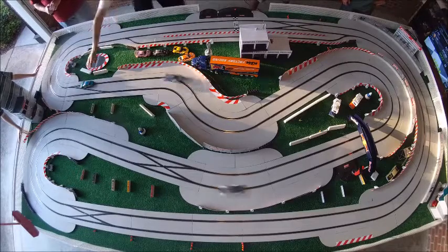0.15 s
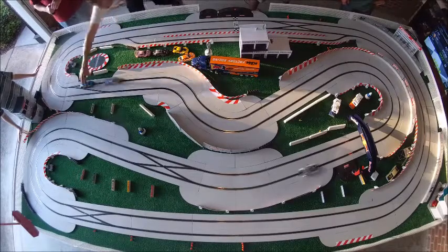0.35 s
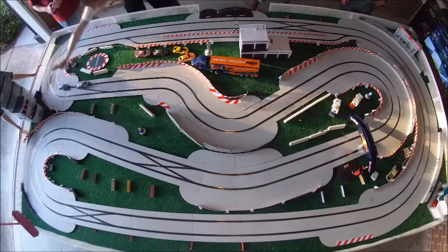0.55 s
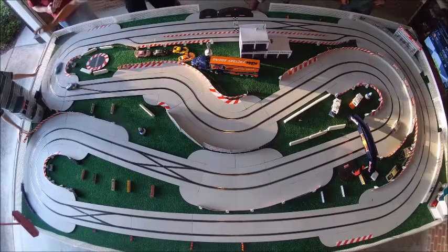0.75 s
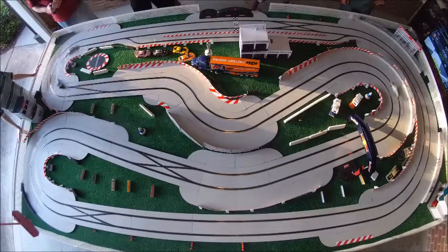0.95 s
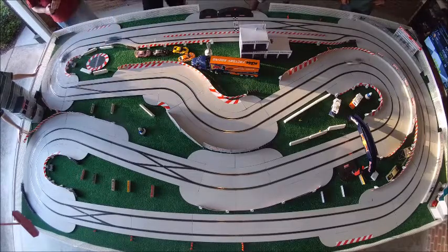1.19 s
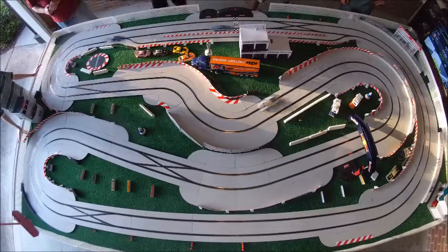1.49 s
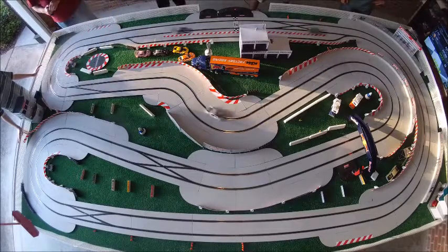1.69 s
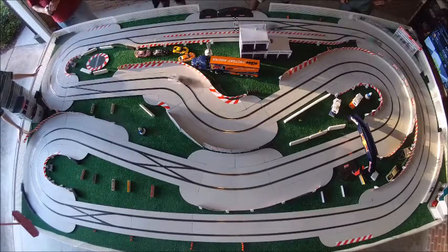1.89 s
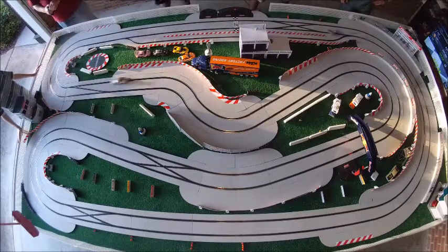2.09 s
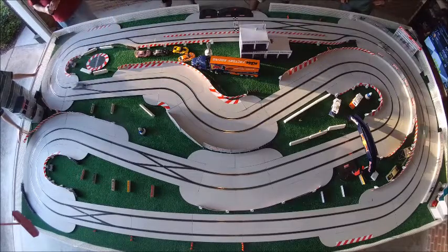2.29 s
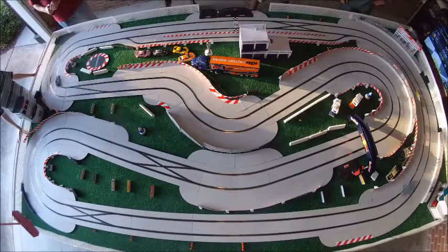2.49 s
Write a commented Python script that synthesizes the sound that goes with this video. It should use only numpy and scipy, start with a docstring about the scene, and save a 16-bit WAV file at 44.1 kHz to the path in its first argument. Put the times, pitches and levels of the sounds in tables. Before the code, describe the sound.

Small electric toy cars hiss and drum along a hollow plastic track, heard from overhead in a room at home. A sharp crack comes as two collide, then one speeds up with a rising whine amid scattered clicks.

```python
"""In a lively room, toy slot cars run round a plastic track, heard from above the table.
Tyres drum the hollow track, metal braids (the cars' electric contacts) hiss on the rails, and a gear
whines as one car speeds up. Guide pins tick over the joints, and one car smacks into another with a
crack that rings through the room. Brief tones come and go over soft room noise and a faint hum."""
import sys
import numpy as np
from scipy import signal
from scipy.fft import rfft, irfft
from scipy.io import wavfile
from scipy.ndimage import uniform_filter1d

SR = 44100
rng = np.random.default_rng(int(sys.argv[2]) if len(sys.argv) > 2 else 0)


def dump_mix(stems):
    """Bounce the given channels to the path in sys.argv[1] as a 16-bit WAV at rate SR."""
    frames = np.atleast_2d(stems).T  # one column per channel
    limited = np.clip(frames, -1, 1)  # hard clip at full scale
    pcm = np.round(limited * 32767).astype(np.int16)
    wavfile.write(sys.argv[1], SR, pcm)


N = 116865

# How loud the running cars are. Each row: time in seconds, drumming in dB, hiss in dB, sizzle in dB.
CAR_LEVELS = [(0, -38, -41, -54), (.13, -44, -42.5, -58), (.25, -38, -34.5, -52), (.34, -42, -44.5, -59),
              (.41, -42, -40.5, -62), (.46, -37.5, -42, -61), (.55, -44, -37, -48), (.74, -52, -51, -69),
              (.92, -48.5, -46.5, -62), (.98, -46.5, -47.5, -65), (1.04, -39, -42, -61),
              (1.13, -40, -42.5, -61), (1.24, -40, -37.5, -59), (1.43, -41, -39.5, -54.5),
              (1.6, -36.5, -35, -51), (1.69, -38.5, -36, -52.5), (1.78, -37.5, -37, -52),
              (1.87, -40.5, -37.5, -55), (2.0, -37, -36, -55), (2.1, -39, -38.5, -50.5),
              (2.19, -36, -35, -49.5), (2.37, -41, -41.5, -56.5), (2.65, -40.5, -41.5, -56)]
# The notes the hollow track rings at. Each row: pitch in Hz, width in Hz, relative level in dB.
TRACK_NOTES = [(340, 260, -24), (485.3, 141, -10.5), (650, 270, -2), (815, 223, -4.5), (1061, 356, -1),
               (1301, 350, 0), (1524, 385, -2)]


def undb(db):
    """Turn decibels into a number to multiply a sound by."""
    return 10 ** (np.asarray(db) / 20)


def unit(x):
    """Scale a sound so that its average strength (rms) is 1."""
    return x / np.sqrt(np.mean(x ** 2))


def curve(table, col):
    """Join the values in one column with straight lines over time."""
    rows = np.array(table, float)
    return np.interp(np.arange(N) / SR, rows[:, 0], rows[:, col])


def colour(x, points, skirt_db=30):
    """Shape the tone by (Hz, dB) points; beyond them it falls by skirt_db per octave."""
    hz, db = np.array(points, float).T
    octave, marks = np.log2(np.fft.rfftfreq(N, 1 / SR) + 1), np.log2(hz)
    outside = np.clip(marks[0] - octave, 0, 9) + np.clip(octave - marks[-1], 0, 9)
    return irfft(rfft(x) * undb(np.interp(octave, marks, db) - skirt_db * outside), N)


def band(x, hz, width):
    """Keep the sound near one pitch, as a ringing object does; the width is in Hz."""
    return signal.lfilter(*signal.iirpeak(hz, hz / width, fs=SR), x)


def walk(rate):
    """A smooth random wobble of size about 1, with `rate` new values a second."""
    hold = int(SR / rate)
    steps = np.repeat(rng.standard_normal(N // hold + 1), hold)
    return 1.37 * uniform_filter1d(uniform_filter1d(steps, hold), hold)[:N]


def grit(per_s, scatter_db):
    """Many tiny bumps of uneven size, at random moments."""
    chance, side, size = rng.random((N, 3)).T
    return (chance < per_s / SR) * np.sign(side - .5) * undb(-scatter_db * np.log(size + 0.0014))


def room_air():
    """Soft room noise whose bass comes and goes, and a faint wavering hum."""
    # The tone of the room noise. Each row: pitch in Hz, relative level in dB.
    air_tone = [(30, -33), (100, -30), (200, -25), (294, -20), (447, -7.5), (900, -3), (1240, -4),
                (1990, -6.5), (3360, -5.5), (6480, -13.5), (9000, -32), (15800, -31)]
    # How loud the hum is. Each row: time in seconds, level in dB.
    hum_levels = [(0, -67), (.3, -78), (.42, -70), (.5, -88), (1.6, -84), (2.65, -80)]
    hum = unit(band(rng.standard_normal(N), hz=130, width=14)) * undb(curve(hum_levels, col=1))
    noise = unit(colour(rng.standard_normal(N), air_tone)) * undb(-48)
    bass = signal.sosfilt(signal.butter(2, 110, fs=SR, output="sos"), noise)
    return noise - bass + bass * undb(4.4 * walk(5.6) - 2) + hum


def room_echo(x):
    """Sound bounces round the room and dies away, each range of pitches at its own speed."""
    # How long the room rings. Each row: pitch in Hz, seconds to fade by 60 dB.
    fade_times = [(500, 0.32), (1300, 0.77), (3500, 0.57), (6500, 0.61), (11000, 0.3)]
    hz, seconds = np.array(fade_times).T
    t, tail = np.arange(SR) / SR, 0
    for low_hz in 250 * 2. ** np.arange(0, 6.4, .5):  # bands half an octave wide
        fade_s = np.interp(np.log(low_hz * 2 ** .25), np.log(hz), seconds)
        edges_hz = [low_hz, min(low_hz * 2 ** .5, SR * .49)]
        one_band = signal.butter(2, edges_hz, "band", fs=SR, output="sos")
        tail += signal.sosfilt(one_band, rng.standard_normal(SR)) * undb(-60 * t / fade_s)
    tail *= np.clip(t / 0.0041, 0, 1) ** 2  # the echo takes a moment to build up
    return signal.fftconvolve(x, tail / np.sqrt(np.sum(tail ** 2)))[:N]


def squeaks():
    """Brief wavering tones, from low hums to high squeaks."""
    # The tones. Each row: start in seconds, length in seconds, pitch in Hz, level in dB, wobble in Hz.
    brief_tones = [(0.28, 0.075, 521, -49, 24.6), (0.986, 0.12, 645, -46.5, 10), (1.1, 0.16, 482, -47.5, 6),
                   (1.015, 0.14, 1387, -39.5, 150), (1.08, .1, 1900, -48, 120), (1.187, .14, 2410, -45, 70),
                   (1.46, 0.029, 3380, -45, 46), (1.645, 0.05, 5010, -43, 6), (1.915, 0.08, 5005, -41, 4),
                   (1.709, 0.046, 650, -42, 30), (1.7, .25, 1318, -42, 124), (1.75, 0.04, 1030, -39, 25),
                   (1.988, 0.063, 830, -43, 20), (2.0, 0.068, 1205, -39, 15), (2.123, 0.04, 1220, -46, 20),
                   (2.16, 0.056, 1560, -38, 38)]
    t, out = np.arange(N) / SR, 0
    for start, length, hz, db, wobble_hz in brief_tones:
        swell = np.sin(np.pi * np.clip((t - start) / length, 0, 1)) ** .5
        cycles = np.cumsum(hz + wobble_hz * walk(90)) / SR
        out += undb(db + 2 * walk(59.64)) * swell * np.sin(2 * np.pi * cycles)
    return out


def gear_whine():
    """A small gear drives a bigger one: a rough tone and its octave, rising as the car speeds up."""
    # The whine of the teeth. Each row: time in seconds, pitch in Hz, level in dB, octave's level in dB.
    whine = [(.78, 815, -62, -76), (.85, 865, -52, -65), (.93, 930, -50, -68), (1.0, 985, -46, -59),
             (1.04, 1026, -52, -62), (1.07, 1085, -41, -55), (1.17, 1090, -41.5, -53),
             (1.22, 1140, -47, -52), (1.26, 1210, -39, -47), (1.33, 1221, -45, -45),
             (1.41, 1275, -40.5, -50), (1.45, 1380, -56, -60), (1.52, 1412, -65, -67)]
    pitch_wobble, rough_db = .018, 3.5
    hz = curve(whine, col=1) * (1 + pitch_wobble * walk(120))
    phase = 2 * np.pi * np.cumsum(hz) / SR
    t, out = np.arange(N) / SR, 0
    for harmonic in (1, 2):
        level_db = curve(whine, col=harmonic + 1) + rough_db * walk(44.9)
        out += undb(level_db) * np.sin(harmonic * phase)
    return out * ((t > whine[0][0]) & (t < whine[-1][0]))


def track_drumming():
    """Tyres and guide pins shake the hollow track; each of its notes wavers on its own."""
    drum = 0
    for hz, width, db in TRACK_NOTES:
        gain = undb(db + 2 * walk(7.06))
        bumps = grit(per_s=5000, scatter_db=2.5)
        drum += gain * unit(band(band(bumps, hz, width), hz, 1.22 * width))
    return unit(drum) * undb(curve(CAR_LEVELS, col=1))


def braid_hiss():
    """Metal braids scrape the rails: a gritty, wavering hiss with a thin sizzle on top."""
    # The tone of the hiss and of the sizzle. Each row: pitch in Hz, relative level in dB.
    hiss_tone = [(1800, -4.5), (2400, -2.5), (2900, -4), (3400, -1), (4500, -5.5), (5300, -2.5),
                 (6300, -4.5), (7500, -12.5), (8500, -21)]
    sizzle_tone = [(8500, 1.5), (9500, -5.5), (12900, -9), (15800, -24)]
    scrape = unit(grit(per_s=2500, scatter_db=2)) + 0.64 * rng.standard_normal(N)
    flicker = undb(walk(18))  # about 1 dB up and down
    wavering = sum(undb(2 * walk(7.54)) * band(scrape, hz, 1.46 * hz)
                   for hz in (2000, 3100, 4200, 6000, 8200))
    hiss = unit(colour(wavering, hiss_tone)) * undb(curve(CAR_LEVELS, col=2))
    sizzle_db = curve(CAR_LEVELS, col=3) + 0.5 * walk(13)
    sizzle = unit(colour(scrape, sizzle_tone, skirt_db=11)) * undb(sizzle_db)
    return flicker * (hiss + sizzle)


def ticks_and_crash():
    """Each hit cracks, rings the car's shell and thuds the track. Gives direct sound and echo feed."""
    # Guide pins hitting joints, and car hitting car. Each row: start in seconds, peak in dB,
    # pitch in Hz, width in Hz, length in seconds, relative thud level in dB.
    hits = [(0.169, -24.5, 5360, 4000, 0.0049, -7), (0.239, -24, 3000, 2520, 0.0025, 2),
            (0.36, -25.5, 5460, 3500, 0.0036, -14), (0.399, -22, 5670, 2480, 0.0069, -25),
            (0.4047, -22, 5200, 5000, 0.0066, 1), (.471, -26, 6500, 5000, 0.0038, -10),
            (0.4753, -4.5, 6000, 7000, 0.0015, -5.5), (.4782, -8, 3800, 4950, 0.0035, -6),
            (0.4832, -14, 6400, 2500, 0.0049, 3), (.494, -20, 5000, 4000, 0.0066, -2),
            (0.5, -18, 6000, 4000, 0.0047, -2), (0.509, -19.5, 4200, 2500, 0.0043, -11),
            (0.5134, -13.5, 4760, 4000, .004, -7), (1.203, -23.5, 5500, 6000, 0.0037, -5),
            (1.277, -26, 5000, 4000, 0.0036, -7), (1.469, -30, 3450, 1200, 0.0092, -12),
            (1.61, -21, 3860, 2980, 0.0054, -19), (1.717, -12.5, 5560, 5500, 0.0021, -25),
            (1.73, -27, 6500, 4000, .003, -10), (1.7625, -12.5, 7150, 3500, 0.0025, -1),
            (1.767, -19, 6000, 4000, 0.003, -2), (1.78, -24, 5540, 2500, .005, 1),
            (1.791, -26, 5570, 3000, .005, -10), (1.877, -23.5, 6000, 2480, 0.0046, -19),
            (2.016, -24.5, 3660, 3020, 0.0052, -16), (2.09, -18.5, 7600, 5200, 0.0028, -28),
            (2.1, -24, 3800, 2000, 0.0066, -8), (2.109, -26, 3900, 2500, .006, -12),
            (2.12, -25.5, 3330, 1200, .004, -13), (2.1505, -19.5, 5600, 2800, 0.0093, 3),
            (2.169, -19.5, 6000, 5000, .001, -15), (2.182, -23.5, 5000, 4000, 0.0045, -18),
            (2.218, -27, 3760, 2000, .01, -10), (2.24, -14, 6000, 3000, 0.0013, -20),
            (2.271, -18, 6000, 4500, 0.0013, 4), (2.427, -23.5, 5460, 5040, 0.0045, -12),
            (2.492, -26.5, 6000, 5100, 0.0062, -14)]
    # The plastic shell's notes. Each row: pitch in Hz, relative level in dB, rough ring time in seconds.
    shell_notes = [(2560, 7, 0.0047), (3070, -8, 0.0032), (3880, -5, 0.0026), (5200, 5.5, 0.015),
                   (6350, 5, 0.029), (7350, -23, 0.0031), (8140, -11, 0.006)]
    out, t = np.zeros((2, N + 4096)), np.arange(2048) / SR
    click = 1. * (t == 0)
    cut_highs = signal.butter(4, 8060, fs=SR, output="sos")
    cut_lows = signal.butter(4, 2300, "high", fs=SR, output="sos")

    def peak_one(x):
        return x / np.abs(x).max()

    def soften(x):  # a little of the top treble stays in, for snap
        return signal.sosfilt(cut_lows, signal.sosfilt(cut_highs, x) + undb(-22) * x)

    def crackle(x, hz, width):
        return band(band(x, hz, width), hz, 1.8 * width)

    def thud(x):  # only the track's three highest notes
        return sum(undb(db) * band(band(x, hz, width), hz, 3 * width) for hz, width, db in TRACK_NOTES[4:])

    for start, peak_db, hz, width, length, thud_db in hits:
        rise_s, fade_s = .4 * length, length / 2
        shape = np.minimum(t / rise_s, 1) * np.exp(-np.maximum(t - rise_s, 0) / fade_s)
        push = rng.standard_normal(len(t)) * shape
        crack = crackle(push, hz, width)
        ring = sum(undb(db) * band(crack, note_hz, 0.49 / ring_s) for note_hz, db, ring_s in shell_notes)
        plastic = soften(peak_one(crack) + undb(-17) * peak_one(ring))
        direct = undb(peak_db) * peak_one(plastic + undb(thud_db - 11) * thud(peak_one(push)))
        to_room = soften(crackle(click, hz, width)) + undb(thud_db) * thud(click)
        first = int(start * SR)
        out[:, first:first + len(t)] += direct, unit(to_room) * np.std(direct)
    return out[:, :N]


def scene():
    """Mix the running cars, their hits, the echo of both and the room noise into one channel."""
    cars = track_drumming() + braid_hiss() + gear_whine() + squeaks()
    hits, hits_to_room = ticks_and_crash()
    echo = room_echo(undb(-10) * cars + undb(-5.5) * hits_to_room)
    return (cars + hits + echo + room_air())[None]


def record(dry):
    """Cut away the very highest treble, above 15830 Hz."""
    return signal.sosfilt(signal.ellip(10, .2, 70, 15830, fs=SR, output="sos"), dry)


dry = scene()
out = record(dry)
dump_mix(out)
```